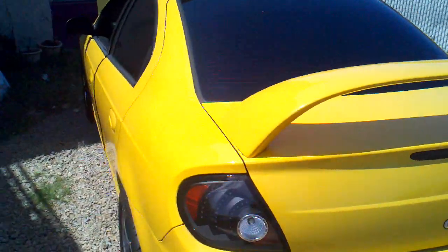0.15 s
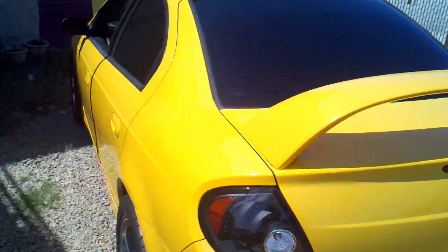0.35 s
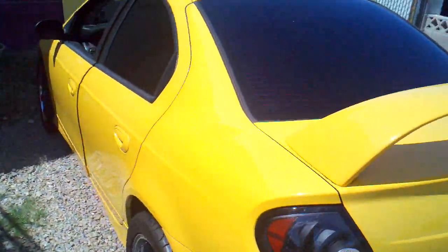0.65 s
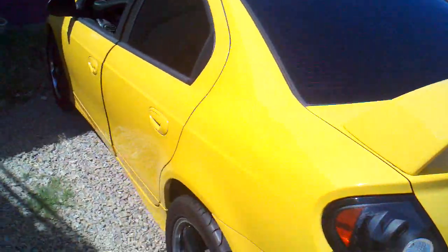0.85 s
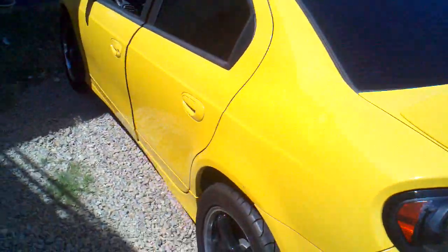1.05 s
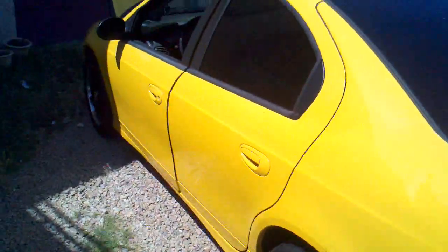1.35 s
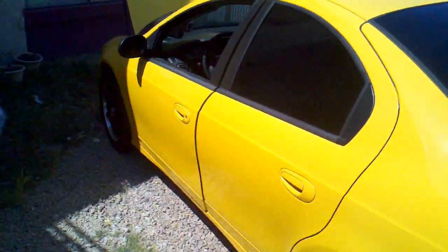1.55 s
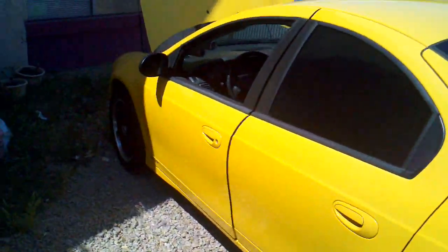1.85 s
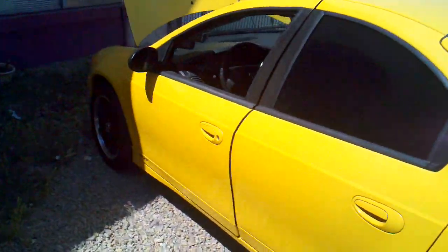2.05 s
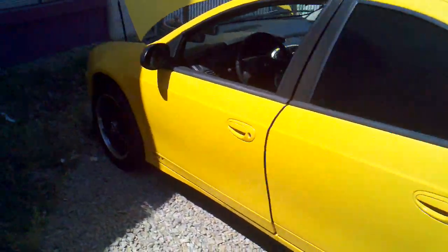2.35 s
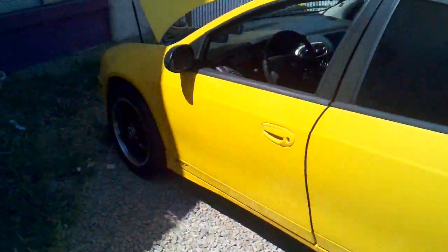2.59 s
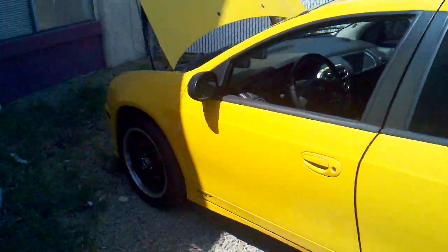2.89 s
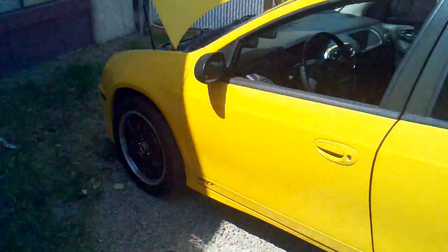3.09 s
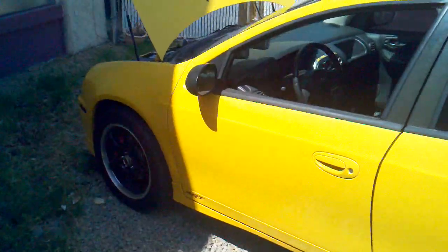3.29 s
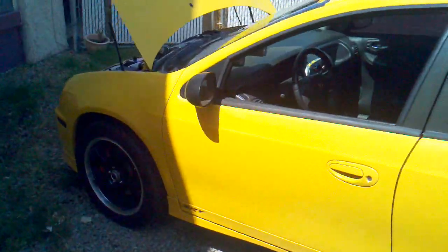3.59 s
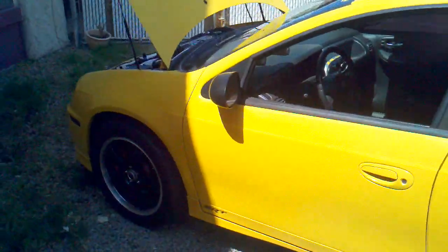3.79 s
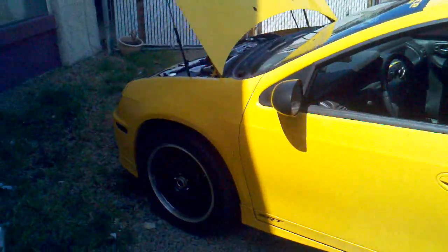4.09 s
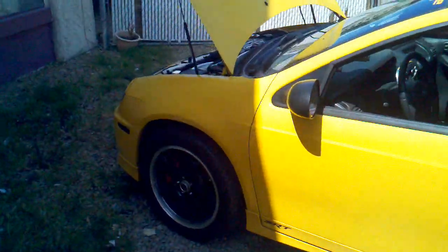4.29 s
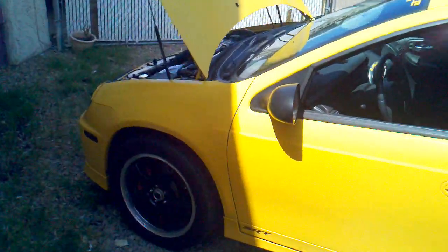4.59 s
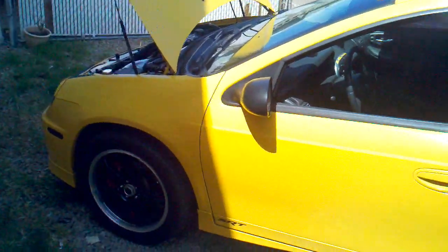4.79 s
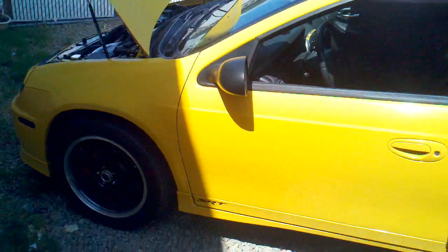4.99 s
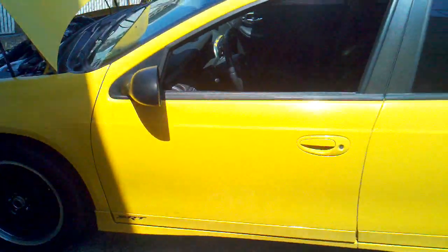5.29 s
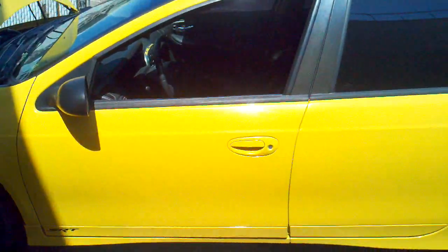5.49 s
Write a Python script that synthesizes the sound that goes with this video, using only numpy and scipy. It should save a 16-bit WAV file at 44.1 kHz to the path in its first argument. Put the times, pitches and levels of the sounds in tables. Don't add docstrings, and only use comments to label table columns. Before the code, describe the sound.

A four-cylinder car idles with a heavy loping chop, deep exhaust thuds and hard pops fading as hiss and gravel steps grow.

```python
import sys
import numpy as np
from scipy import signal
from scipy.fft import rfft, irfft
from scipy.io import wavfile
from scipy.ndimage import uniform_filter1d

SR = 44100
rng = np.random.default_rng(int(sys.argv[2]) if len(sys.argv) > 2 else 0)


def invert_db(level):
    return 10 ** (np.asarray(level, dtype=float) / 20)


def transcribe(signal):
    frames = np.atleast_2d(signal).T
    limited = np.clip(frames, -1, 1)
    pcm = np.round(limited * 32767).astype(np.int16)
    wavfile.write(sys.argv[1], SR, pcm)


N = 249165

# [t/s, peak/dB, build-up/dB, after-burn/dB, crack/dB]
LOPES = [(0.143, -10, 1.5, -12, -20.5), (0.411, -11, 2, 0, -22), (0.683, -11.5, 3.5, 11.5, -20.5),
         (0.955, -5.5, -9.5, -14, -15.5), (1.227, -9.5, 0.5, -9.5, -20), (1.492, -11.5, 5, 9.5, -21),
         (1.765, -9.5, -1.5, -4.5, -18.5), (2.044, -14.5, 5, 7, -23), (2.312, -11, 0.5, -0.5, -20),
         (2.58, -12, 4.5, 0, -22.5), (2.856, -13, -3, -11, -20), (3.124, -11.5, -2, -13.5, -17.5),
         (3.396, -14, 4.5, 2, -24.5), (3.668, -11, -1, 3.5, -22.5), (3.937, -11, 0.5, 3.5, -23.5),
         (4.208, -6.5, -2, -11, -16), (4.48, -13.5, 7.5, 8, -23), (4.748, -10, 3, -2.5, -26.5),
         (5.026, -13.5, 0, 7.5, -29), (5.299, -14, 3, 3, -27), (5.569, -12, -4.5, 1.5, -30)]
# [t/s, distance from tailpipe/m]
WALK = [
    (0, 0.01),
    (1.4, 0.67),
    (2.8, 1.29),
    (4.2, 2.24),
    (5.65, 2.74),
]


def rms_one(x):
    return x / np.sqrt(np.mean(x ** 2) + 1e-20)


def in_time(rows):
    s, *columns = np.transpose(rows)
    return [np.interp(np.arange(N) / SR, s, c) for c in columns]


def at_hz(points, hz):
    table = np.array(points)
    return np.interp(np.log(hz + 1), np.log(table[:, 0]), table[:, 1])


def drift(rate_hz):
    r = np.exp(-80 * np.pi * rate_hz / SR)
    noise = rng.standard_normal(N // 40 + 2002)
    slow = signal.lfilter([1], [1, -2 * r, r * r], noise)[2000:]
    return np.interp(np.arange(N) / 40, np.arange(len(slow)), rms_one(slow))


def ring(x, hz, t60_s):
    r, w = invert_db(-60 / (t60_s * SR)), 2 * np.pi * hz / SR
    return signal.lfilter([0, np.sin(w)], [1, -2 * r * np.cos(w), r * r], x + 1e-18)


def decay(x, tau_s):
    return signal.lfilter([1], [1, -np.exp(-1 / (tau_s * SR))], x + 1e-18)


def band(x, low_hz, high_hz):
    return signal.sosfilt(signal.butter(2, [low_hz, high_hz], "band", fs=SR, output="sos"), x)


def coloured(spectrum):
    hz = np.fft.rfftfreq(N + 1, 1 / SR)
    white = rfft(rng.standard_normal((2, N + 1)))
    return rms_one(irfft(white * invert_db(at_hz(spectrum, hz)), N + 1)[:, :N])


def patchy(x, edges_hz, patchy_db):
    hz, full = np.fft.rfftfreq(N + 1, 1 / SR), rfft(x, N + 1)
    out = 0
    for lo, hi in zip(edges_hz, edges_hz[1:]):
        part = irfft(full * ((hz >= lo) & (hz < hi)), N + 1)[:, :N]
        out = out + invert_db(patchy_db * drift(26)) * part
    return out


def scuffs():
    # [t/s, peak/dB]
    slides = [(.69, -66.5), (1.2, -67), (1.44, -95), (1.99, -68), (2.31, -59), (2.47, -59), (3.05, -60),
              (3.59, -56), (3.93, -56), (4.14, -50.5), (4.66, -55.5), (4.92, -64), (5.2, -77), (5.63, -82)]
    t = np.arange(N) / SR
    width_s = 0.021
    return sum(invert_db(db) * np.exp(-((t - s) / width_s) ** 2) for s, db in slides)


def bay_db():
    start_db, rise_db, near_m = -63, 8, 0.78
    breath_db, breath_place = 0.83, 0.94
    metres, = in_time(WALK)
    turns = np.interp(np.arange(N) / SR, np.array(LOPES)[:, 0], np.arange(len(LOPES)))
    approach = rise_db * (1 - np.exp(-metres / near_m))
    return start_db + approach + breath_db * np.cos(2 * np.pi * (turns - breath_place))


def engine_bay(at, rasp_db):
    # [f/Hz, density/dB per Hz]
    hiss = [(1500, 6), (2500, 7), (3500, 2), (5100, -4), (6500, -1), (8900, 1), (10500, 0.5), (11500, -3),
            (14500, -4)]
    # [t/s, peak/dB]
    crunch = [
        (1.6287, -53),
        (1.8243, -52),
        (2.7826, -57),
        (3.82, -50),
        (4.1195, -69),
        (4.3994, -44),
        (5.4925, -48),
    ]
    hiss_db = bay_db()
    clicks, stones = np.zeros((2, N))
    clicks[at] = invert_db(rasp_db + 16 - 8.8 * at / SR)
    stones[[int(s * SR) for s, db in crunch]] = invert_db(np.array(crunch)[:, 1] + 0.5)
    ticks = (rng.random(N) < 90 / SR) * rng.exponential(0.064, N)
    gate = 1 + 1.96 * decay(clicks, 0.0093) + decay(ticks, 0.012)
    level = invert_db(hiss_db + 5.5 + 0.66 * drift(24)) * rms_one(gate)
    level = level + decay(stones, 0.011) + invert_db(0.5) * scuffs()
    return patchy(level * coloured(hiss), [0, 3900, 6400, 10400, 15000], patchy_db=1.12)


def yard(x, echoes):
    dull = signal.lfilter([.15], [1, -.85], x)
    return x + sum(invert_db(db) * np.pad(dull, ((0, 0), (int(s * SR), 0)))[:, :N] for s, db in echoes)


def hoots():
    # [t/s, level/dB, f/Hz]
    swells = [
        (0.176, -21.5, 422),
        (.545, -23.5, 409.7),
        (0.722, -22, 400),
    ]
    t = np.arange(N) / SR
    out = np.zeros(N)
    for s, db, hz in swells:
        out += invert_db(db) * np.sin(2 * np.pi * hz * t) * np.sin(np.pi * np.clip((t - s) / 0.027, 0, 1))
    return out


def along(metres):
    # [level at tailpipe/dB, slope/dB per m, ripple/dB, ripple length/m, crest position/m]
    layers = [
        (-1.5, 1.08, 5, 1.62, 1.534),
        (2, -0.7, 3, 2.12, 2.05),
        (-9.5, 3, 5, 1.95, 1.24),
        (-8, 4, 4, 2.3, 1.26),
        (-10, -6.5, 0.5, 3.2, 0.26),
    ]
    return [db + slope * metres + ripple * np.cos(2 * np.pi * (metres - crest) / length)
            for db, slope, ripple, length, crest in layers]


def firings():
    # [place after the pop/0-1, pressure/dB, snap/dB, rasp/dB]
    pattern = [
        (0, -0.5, 3, 2),
        (.125, -2, -11, -25),
        (0.249, -18, -15.5, -18.5),
        (.38, -16, -15.5, -10.5),
        (.51, -12, -20.5, -14.5),
        (.64, -6, -13.5, -1),
        (.765, -2.5, -9, 0),
        (.885, 3.5, -4.5, 0),
    ]
    build_from, build_fade = 0.46, 1
    burn_place, burn_spread = 0.31, .2
    thud_follows, thud_memory = 0.83, 0.27
    top_follows, top_db = 0.96, 2
    early_pop_s, early_fade_s = .005, 1.5

    lopes = np.array(LOPES)
    place, pressure_db, snap_db, rasp_db = np.transpose(pattern)
    gap = np.array([0.271, 0, 0, 0, 0])
    lopes = np.vstack([lopes[:1] - gap, lopes, lopes[-1:] + gap])
    now, then = lopes[:-1, None], lopes[1:, None]
    luck = rng.standard_normal((len(now), len(place), 2)) * (place[:, None] > 0)
    s = now[..., 0] + place * (then[..., 0] - now[..., 0]) + 0.00089 * luck[..., 0]
    s = s + early_pop_s * np.exp(-s / early_fade_s) * np.clip((place - .7) / .18, 0, 1)

    owner = np.where(place[:, None] > .45, then, now)
    peak_db, crack_db = owner[..., 1], owner[..., 4]
    build = (place > .3) * np.clip(1 - build_fade * (place - build_from), 0, 1)
    burn = np.exp(-((place - burn_place) / burn_spread) ** 2)
    extra_db = build * then[..., 2] + burn * now[..., 3] + 0.8 * luck[..., 1]
    held_db = pressure_db + thud_memory * (np.roll(pressure_db, shift=1) - pressure_db)
    levels = [peak_db + thud_follows * held_db,
              peak_db + pressure_db,
              crack_db + snap_db,
              peak_db + rasp_db,
              peak_db + top_follows * snap_db + top_db]
    keep = (s >= 0) & (s < N / SR - .02)
    return (s[keep] * SR).astype(int), *[(db + extra_db)[keep] for db in levels]


def blown(at, db, modes, puff_s, rough, spread_db, late_s=0, flip=-1, loose=.5):
    out = np.zeros((2, N))
    for port in range(2):
        turbulence = rng.standard_normal(N) * rough / np.sqrt(puff_s * SR)
        for k, (hz, level_db, t60_s) in enumerate(modes):
            clicks = np.zeros(N)
            clicks[at + int(late_s * SR)] = invert_db(db + level_db + spread_db * rng.standard_normal(len(at)))
            sign = flip ** k * np.where(rng.random(N) < loose * port, -1, 1)
            puff = decay(decay(clicks, puff_s), puff_s / 3) * 4 / (puff_s * SR)
            out[port] += ring(sign * clicks + turbulence * puff, hz, t60_s)
    return out


def slap(at, db, push_db):
    mouth = at + int(.002 * SR)
    clicks, push = np.zeros((2, N))
    clicks[mouth] = invert_db(db - 4.5)
    push[mouth] = invert_db(push_db)
    needle = 8.9 * band(clicks, 440, 1410) + 0.91 * band(clicks, 1700, 4600)
    low = 15.5 * band(push, 73, 266) + 2.4 * band(push, 400, 726)
    return (needle + low) * [[1], [.4]]


def swing(at, top_db, near_db):
    level_db, grows, steep = -18.5, 0.086, 1.95
    late_s, width_s = .0052, .00055
    clicks = np.zeros(N)
    hard_db = steep * np.minimum(top_db + 9.5, 0)
    clicks[at + int(late_s * SR)] = invert_db(hard_db + level_db - grows * (near_db + 28.5))
    widths = np.arange(-120, 121) / (width_s * SR)
    return np.convolve(clicks, -widths * np.exp((1 - widths ** 2) / 2), "same") * [[1], [.3]]


def exhaust(at, thud_db, boom_db, crack_db, rasp_db, top_db):
    # [f/Hz, level/dB, t60/s]
    pipe = [(56.6, -12, 0.061), (100.7, -2, 0.25), (120.1, -1, 0.13), (152, -8, 0.086)]
    muffler = [(209.2, 5, 0.073), (255.3, -0.5, 0.082), (302.9, -3.5, 0.39), (332, 1.5, 0.1),
               (358.4, -2, 0.13), (399.9, -0.5, 0.22), (510, -14, 0.037)]
    crack_modes = [(495.7, -0.5, 0.082), (623, -1.5, 0.021), (730, -14, 0.058), (854, -27.5, 0.18)]
    rasp_modes = [(918, -1.5, 0.026), (1104, -8, 0.06), (1225, -1, 0.035), (1670, -9, 0.015),
                  (1948, -14, 0.01), (2280, -21, 0.018), (2850, -20, 0.02), (3540, -42, 0.0086)]
    # [f/Hz, density/dB per Hz]
    rumble_spectrum = [(30, -34), (60, 0.5), (76, -9.5), (98, -1), (125, -8), (160, -5), (205, -0.5),
                       (330, -1.5), (520, -8.5), (700, -17.5), (1150, -23), (1950, -35.5), (2400, -63),
                       (3000, -88)]

    deep_db, upper_db, low_db, middle_db, near_db = along(in_time(WALK)[0][at])
    thud = blown(at, thud_db + deep_db - 13.5, pipe[:2],
                 puff_s=.008, rough=.1, spread_db=.6, late_s=.002, loose=.36)
    thud += blown(at, thud_db + upper_db - 16.0, pipe[2:],
                  puff_s=0.016, rough=0.028, spread_db=1.5, late_s=.004, loose=.2)
    boom = blown(at, boom_db + low_db - 9.5, muffler[:2],
                 puff_s=0.004, rough=0.15, spread_db=2.0, late_s=0.0014)
    boom += blown(at, boom_db + middle_db - 18.5, muffler[2:4],
                  puff_s=0.0083, rough=0.28, spread_db=1.5, late_s=0.0013, flip=0.76)
    boom += blown(at, top_db - 15.0, muffler[4:],
                  puff_s=0.0035, rough=0.43, spread_db=3.0, late_s=.0013, flip=0.93)
    crack = blown(at, crack_db - 2.5, crack_modes,
                  puff_s=0.0031, rough=0.63, spread_db=3.0, late_s=.0014)
    rasp = blown(at, rasp_db + near_db - 11.5, rasp_modes,
                 puff_s=0.0064, rough=1.79, spread_db=3.0, late_s=.001)

    clicks = np.zeros(N)
    clicks[at] = invert_db(boom_db)
    swell = 0.74 + 0.74 * rms_one(decay(decay(clicks, 0.0086), 0.015))
    rumble = invert_db(-36.5) * swell * invert_db(2.0 * drift(10.0)) * coloured(rumble_spectrum)

    front = slap(at, crack_db + 0.37 * (near_db + 7), 0.55 * boom_db + 0.46 * (near_db + 10.5) - 6)
    tail = band(boom, 186, 500) + band(crack, 375, 870) + band(rasp, 1143, 3600) + front
    echoed = yard(tail, [(.011, -9.5), (.023, -9), (.047, -14.5), (.066, -13)])
    return band(thud, 53, 145) + echoed + rumble + swing(at, top_db, near_db)


def scene():
    at, *levels = firings()
    pipe = exhaust(at, *levels) + hoots() * [[1], [.6]]
    return pipe + engine_bay(at, (levels[1] + levels[3]) / 2)


def top_cut(x):
    return signal.sosfilt(signal.butter(12, 14250, fs=SR, output="sos"), x)


def record(dry):
    # [f/Hz, share/0-1]
    width = [(30, 0.3), (60, 0.85), (125, 0.44), (250, 0.48), (500, 0.42), (900, 0.57), (1300, 0.98)]
    # [row (0 sum, 1 difference), f/Hz, bandwidth/Hz, rarity/spreads]
    dropouts = [(0, 2600, 420, -.8), (0, 2600, 200, -1.6), (0, 4950, 500, .5), (0, 5400, 450, .5),
                (0, 7900, 600, 1.3), (0, 10400, 500, 1.4), (0, 13000, 700, 1.1), (1, 3900, 800, -.3),
                (1, 6300, 1200, 0), (1, 9000, 1100, 0), (1, 11600, 1400, -.1)]
    comb_hz, top_hz = 2594, 13990
    hz = np.fft.rfftfreq(N + 1, 1 / SR)
    shared, apart = rfft(dry, N + 1) * (hz < top_hz)
    side = np.cos(np.pi * hz / comb_hz) * np.clip(at_hz(width, hz), 0, 1)
    leak = np.clip(0.33 * (hz / comb_hz - 1), 0, .5)
    middle = np.sqrt(1 - side ** 2 + leak ** 2) * shared
    turned = .3j * abs(side) * np.clip(hz / 1800, 0, 1) ** 2 * shared
    both = [middle, side * (0.95 * apart) + turned]
    out = irfft(both, N + 1)[:, :N]
    for row, centre_hz, width_hz, rarity in dropouts:
        row = int(row)
        lost = irfft(both[row] * (abs(hz - centre_hz) < width_hz / 2), N + 1)[:N]
        out[row] -= uniform_filter1d(1. * (drift(20) > rarity), size=400) * lost
    cut = signal.cheby2(6, 26, 41, "high", fs=SR, output="sos")
    return top_cut(signal.sosfilt(cut, [out[0] + out[1], out[0] - out[1]]))


dry = scene()
out = record(dry)
transcribe(out)
```